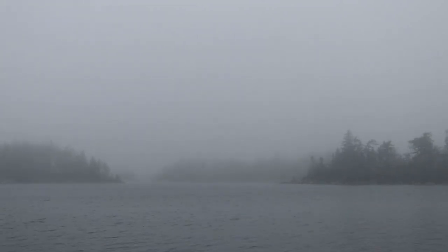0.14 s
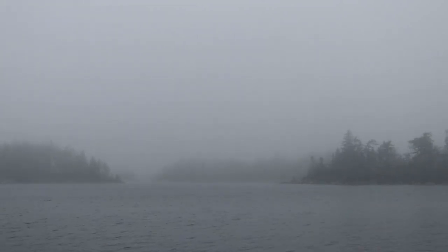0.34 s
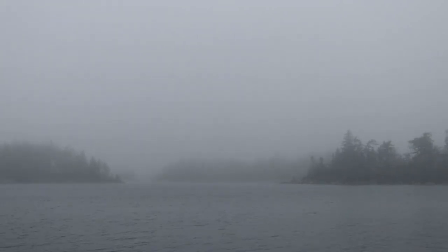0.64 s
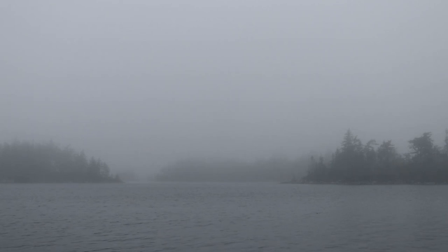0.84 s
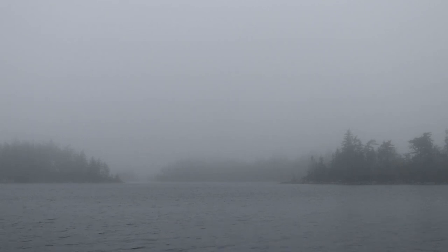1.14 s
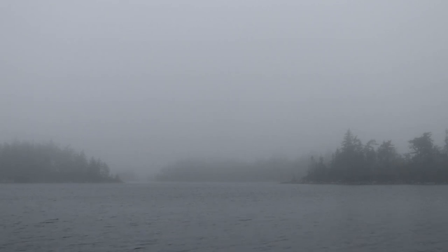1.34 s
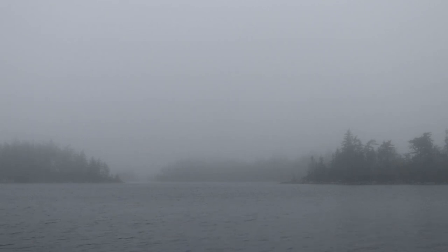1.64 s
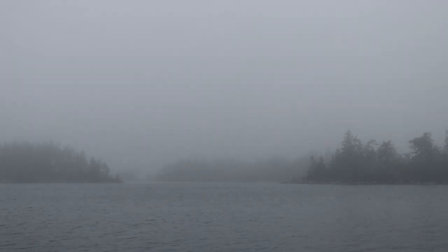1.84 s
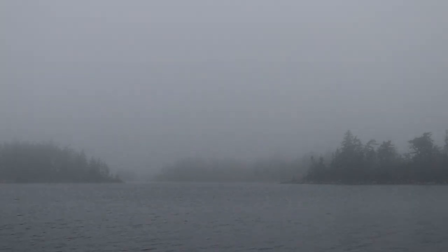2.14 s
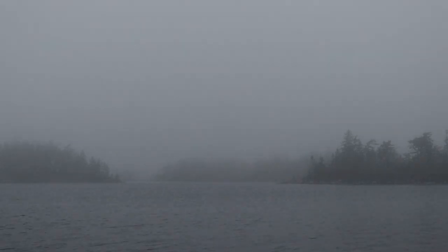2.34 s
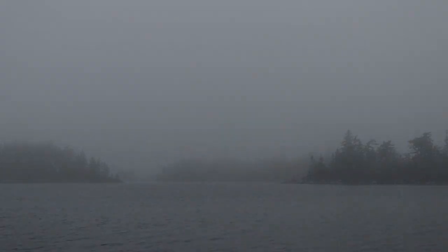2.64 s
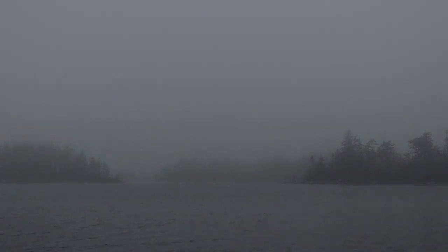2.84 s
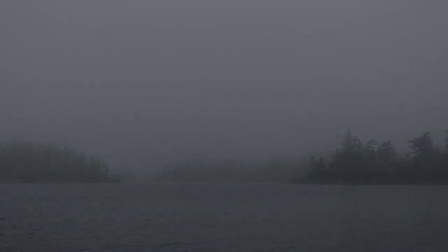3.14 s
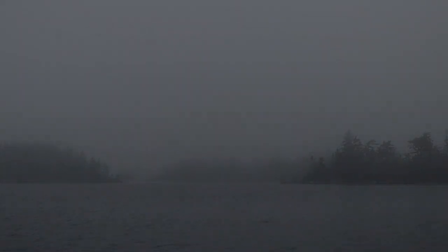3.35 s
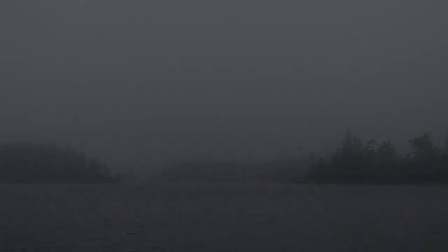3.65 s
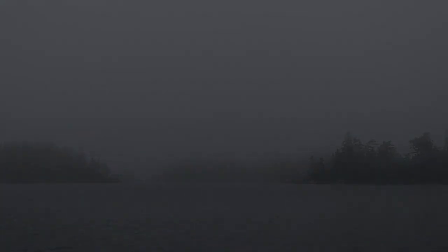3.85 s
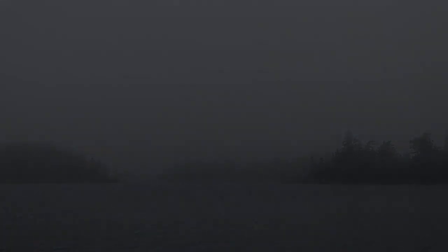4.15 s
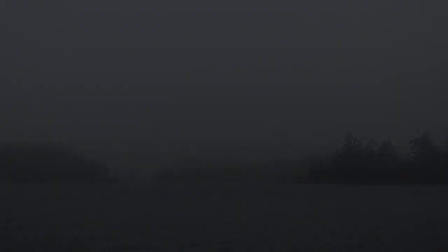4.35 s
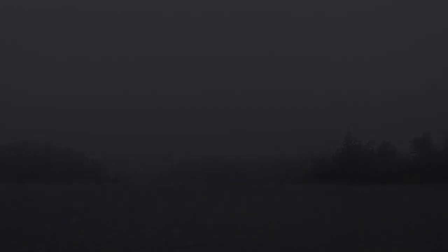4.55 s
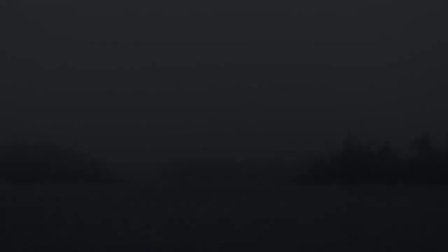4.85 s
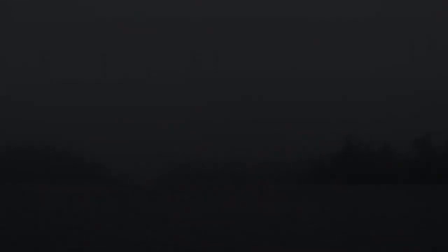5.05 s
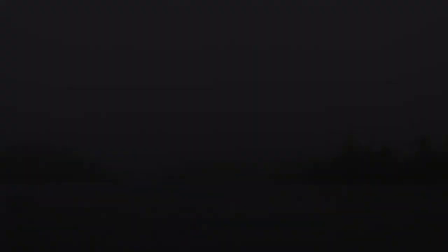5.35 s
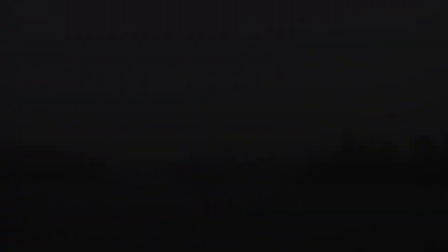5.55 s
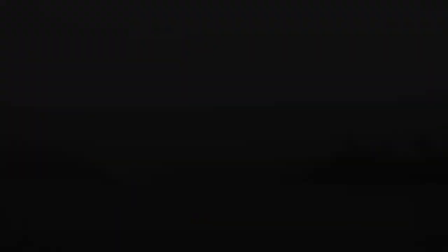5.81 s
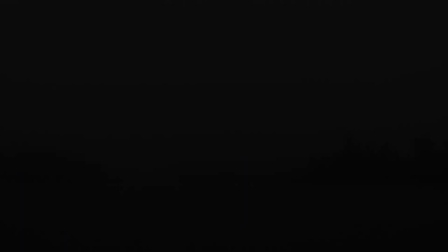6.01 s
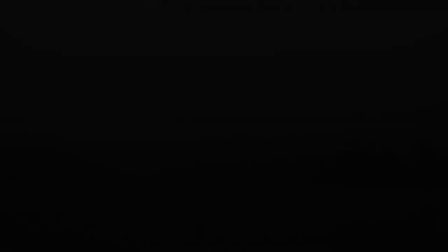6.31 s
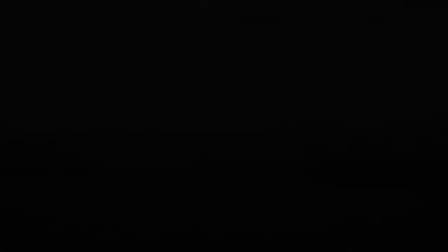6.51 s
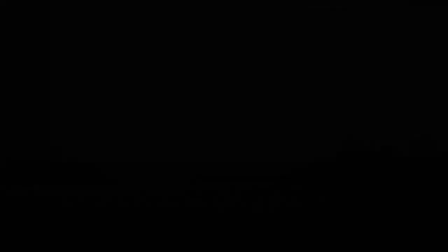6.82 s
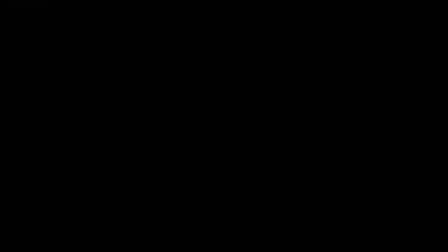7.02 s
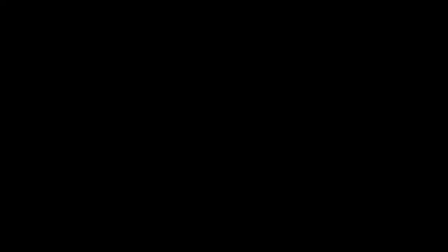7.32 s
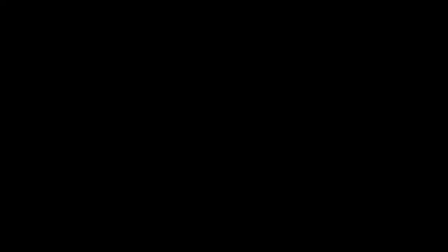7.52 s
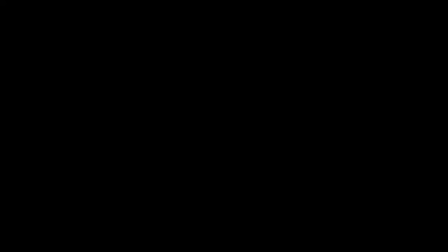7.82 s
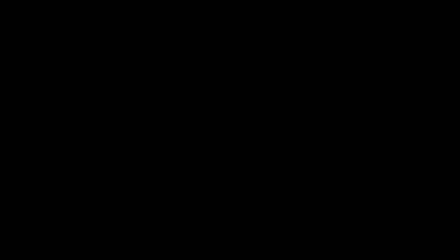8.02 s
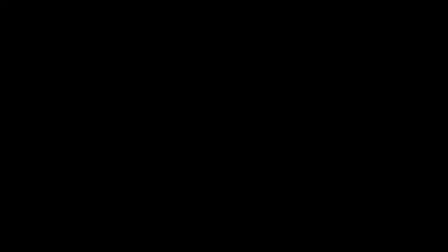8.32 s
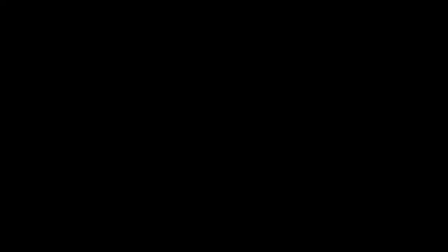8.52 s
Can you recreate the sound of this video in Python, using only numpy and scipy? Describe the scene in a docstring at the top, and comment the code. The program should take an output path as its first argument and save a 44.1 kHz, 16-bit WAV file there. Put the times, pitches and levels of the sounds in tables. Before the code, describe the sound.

Spring peeper frogs whistle shrilly beside a misty lake over a distant chorus, with close campfire pops, soft rustle and a slow fade.

```python
"""Spring peepers by a lake: from the start six near frogs peep over a haze of far ones, and trees echo them.
Air and water rustle throughout as swept tones, noise and damped pulses mix; a campfire ticks and pops close by.
From 1.5 s a bird sings one faint phrase; the slow fade begins at 2.3 s and water plips from 3 s.
Stray chirps are scattered from 4.5 s to 7.6 s; a log sizzles at 4.7 s; from 5.8 s the far chorus dies down,
and one low whoop comes just before the end. Faint noise of opposite sign in the channels widens the near-mono sound."""
import sys
import numpy as np
from scipy import signal
from scipy.fft import rfft, irfft, next_fast_len
from scipy.io import wavfile

SR = 44100
rng = np.random.default_rng(int(sys.argv[2]) if len(sys.argv) > 2 else 0)


def digitize_waveform(pressure):
    """Quantize a signal to 16-bit integers and store it at the path in sys.argv[1].

    Rows of a 2-D input are taken as channels; values are limited to [-1, 1].
    """
    field = np.atleast_2d(pressure).T
    bounded = np.clip(field, -1, 1)
    quanta = np.round(bounded * 32767).astype(np.int16)
    wavfile.write(sys.argv[1], SR, quanta)


N = 382347
TIME = np.arange(N) / SR


def undb(db):
    """Amplitude ratio: 20 dB is a factor of ten."""
    return 10 ** (np.asarray(db) / 20)


def unit(x):
    """Normalisation to a root-mean-square amplitude of 1."""
    return x / np.sqrt(np.mean(x ** 2))


def colour(points, size):
    """Spectral envelope: gain of each bin, from (frequency [Hz], level [dB]) points on a log-frequency axis."""
    hz, db = np.transpose(points)
    bin_hz = np.arange(size // 2 + 1) * SR / size
    return undb(np.interp(np.log(bin_hz + 1), np.log(hz), db))


def noise(points):
    """Spectral shaping: white noise filtered by an envelope, then scaled to rms 1."""
    size = next_fast_len(N, True)
    spectrum = rfft(rng.standard_normal(size))
    return unit(irfft(spectrum * colour(points, size), size)[:N])


def wander(t, rate):
    """Slow random modulation: normal values, rate per second, joined by straight lines."""
    return np.interp(t * rate, np.arange(2048), rng.standard_normal(2048))


def clock(length):
    """Sample times [s] of a short sound, at least 10 ms long."""
    return np.arange(int(max(length, .01) * SR)) / SR


def gate(t, attack, release):
    """Sine-squared envelope: a smooth onset and offset avoid clicks."""
    opening = np.minimum(t / attack, (t[-1] - t) / release)
    return np.sin(np.pi / 2 * np.clip(opening, 0, 1)) ** 2


def add(track, s, sound):
    """Linear superposition of a sound at time s, trimmed to the track."""
    i = int(s * SR)
    a, b = max(i, 0), min(i + len(sound), len(track))
    if b > a:
        track[a:b] += sound[a - i:b - i]


def forest(x, t60, gap=0.0055):
    """Diffuse reverberation off trunks and the far shore: a unit-energy noise tail falls 60 dB in t60."""
    t = np.arange(65536) / SR
    tail = rng.standard_normal(len(t)) * undb(-60 * t / t60) * (t > gap)
    return signal.fftconvolve(x, tail / np.linalg.norm(tail))[:len(x)]


def side_noise():
    """Decorrelation: a faint hiss and rumble that enters the two channels with opposite signs."""
    spectrum = [(30, 4.0), (130, 3.5), (500, 4), (1200, -11.5), (3000, -22.5), (5000, 1.5), (15000, 0.5)]
    return undb(-61.5) * noise(spectrum)


def air():
    """Broadband turbulence: a rustle of water and trees, and low gusts on the microphone as the breeze drops."""
    # spectral density of air and water: (frequency [Hz], relative level [dB per Hz])
    rustle_colour = [(25, 5.5), (60, -3), (120, -3), (250, -2.5), (550, -1), (900, -4.5), (1400, -7.5),
                     (2100, -14.5), (3800, -19), (5500, -20.5), (8000, -22), (15500, -24)]
    # gusts on the microphone: (centre [s], half width to 1/e [s], level before the fade [dB])
    gust_swells = [(0.046, 0.1, -47), (0.522, 0.27, -50), (1.813, 0.064, -44.5)]
    breeze_db, breeze_drop_db_per_s = -57, 2.5
    rustle = noise(rustle_colour) * undb(-48.5 + .5 * wander(TIME, 4.9))
    gusts = sum(undb(db) * np.exp(-((TIME - s) / half) ** 2) for s, half, db in gust_swells)
    wind = undb(breeze_db - breeze_drop_db_per_s * TIME) + gusts
    rumble = noise([(15, 0.5), (35, 3.5), (60, -1), (110, -19.5), (400, -54.5), (2000, -85)])
    return rustle + rumble * wind


def sizzle(start_s=4.68, length=0.37, db=-61):
    """Jet noise: steam escaping briefly from a damp log gives a high hiss that swells and sinks."""
    out, t = np.zeros(N), clock(length)
    steam = noise([(4000, -37), (8000, 17), (10000, 5), (13000, -12)])
    add(out, start_s, undb(db) * steam[:len(t)] * gate(t, t[-1] / 2, t[-1] / 2))
    return out


def plips(ring_s=0.0055):
    """Damped resonance: small bubbles at the water's edge ring and decay with time constant ring_s."""
    # bubbles at the shore: (time [s], frequency [Hz], level before decay and fade [dB])
    bubbles = [(3.03, 2150, -40), (5.695, 2140, -33), (5.697, 1250, -32.5), (5.989, 1276, -34)]
    out, t = np.zeros(N), clock(.06)
    for s, hz, db in bubbles:
        ring = np.sin(2 * np.pi * hz * t) * np.exp(-t / ring_s)
        add(out, s, undb(db) * ring * gate(t, 0.0027, .01))
    return out


def crack(bass_db, treble_db, echo_db, size=2048):
    """Minimum-phase impulse: wood splits in one sharp pulse; ground and logs return it milliseconds later."""
    # spectral envelope of splitting wood: (frequency [Hz], level [dB])
    wood_colour = [(60, -22.5), (220, -10.5), (700, -4), (1300, 0), (1900, 7.5), (3500, 7), (5600, 0),
                   (7000, 1), (8700, 4.5), (10000, -6), (13500, -5.5), (16000, -20)]
    tilt = [(600, bass_db), (2200, 0.0039), (3500, 0), (8500, treble_db)]
    gain = colour(wood_colour, size) * colour(tilt, size)
    # folding the cepstrum onto positive times gathers the energy at the onset
    cepstrum = irfft(np.log(gain))
    cepstrum[1:size // 2] *= 2
    cepstrum[size // 2 + 1:] = 0
    pulse = irfft(np.exp(rfft(cepstrum)))
    t = np.arange(size) / SR
    # rough bark and stones scatter it; two distinct reflections stand out
    paths = .14 * rng.standard_normal(size) * np.exp(-t / .004)
    paths[[int(.0022 * SR), int(.0041 * SR)]] += (.4, .65)
    return pulse + undb(echo_db) * signal.fftconvolve(pulse, paths)[:size]


def fire(count=55):
    """Impulsive radiation: loud pops among faint ticks, echoed by trees; weaker pops are scattered more."""
    # fire pops: (time [s], level before the fade [dB], bass tilt [dB], treble tilt [dB])
    pops = [(1.073, -21, -19, 9), (2.273, -29, -17, 6), (2.383, -16.5, -16, -9), (2.4754, 13.5, 5, -0.5),
            (2.839, -23.5, -16, 1), (3.085, -33.5, -14.5, 18), (3.108, -7.5, 9.5, 1),
            (3.405, -4.5, 22.5, -6), (4.591, -17, 7, -14), (5.0137, -38, -5, 15), (6.554, -32, -22, 15.5),
            (6.786, -6, 20, -3.5), (7.542, -33, -15, 11.5)]
    echo_at_0_db, echo_slope = -8.5, 0.24  # scatter of a 0 dB pop [dB]; dB less scatter per dB of level
    out = np.zeros(N)
    for s, db, bass_db, treble_db in pops:
        add(out, s, undb(db) * crack(bass_db, treble_db, echo_at_0_db - echo_slope * db))
    for when, loud in rng.random((count, 2)):
        add(out, when * TIME[-1], undb(-38 + 9 * loud ** 2) * crack(-9, 2.3, -1.5))
    return out + undb(-23) * forest(out, t60=0.3)


def chirp(length, start_hz, end_hz, buzz_hz, flutter_hz=210, arch_hz=0):
    """Frequency modulation: a gliding or arched whistle buzzes when its pitch flutters fast and unevenly."""
    t = clock(length)
    u = t / t[-1]
    flutter = np.sin(2 * np.pi * flutter_hz * t + .6 * wander(t, 100))
    glide = start_hz + (end_hz - start_hz) * u + arch_hz * np.sin(np.pi * u)
    hz = glide + buzz_hz * flutter
    whistle = np.sqrt(2) * np.sin(2 * np.pi * np.cumsum(hz) / SR)
    return whistle * gate(t, .006, 0.0082) * undb(3.8 * wander(t, 60))


def whoop(start_s=8.617, length=.044, db=-35):
    """Swept tone: one short, low whoop that weakens as it rises quickly."""
    out = np.zeros(N)
    weakening = undb(db - 130 * clock(length))
    add(out, start_s, weakening * chirp(length, 690, 1380, buzz_hz=22, arch_hz=-110))
    return out


def birds(count=9):
    """Frequency-swept song: whistles, a trill and two buzzes; later stray chirps, a faint whirr and a whistle."""
    # thin whistles that open the phrase: (time [s], length [s], nominal level before the fade [dB])
    whistles = [(1.453, .11, -55.5), (1.89, 0.1, -58), (2.185, 0.045, -47.5), (2.411, 0.067, -52),
                (2.653, 0.07, -58.5)]
    # buzzes that close the phrase: (time [s], centre frequency [Hz], nominal level before the fade [dB])
    buzzes = [(3.363, 5500, -58), (3.763, 5310, -62)]
    # stray arched chirps: (time [s], length [s], start of glide [Hz], nominal level before the fade [dB])
    stray_chirps = [(4.455, .055, 3600, -56), (6.943, .035, 4000, -60), (7.018, .065, 3650, -54),
                    (7.6, .04, 3320, -54)]
    first_hz, phrase_sag_hz_per_s, whistle_sag_hz = 6590, 300, 110
    trill_start_s, trill_step_s, trill_db = 2.748, .0615, -55
    upper_ratio, upper_db = 1.3, -10  # pitch ratio and relative level of the second voice
    out = np.zeros(N)
    # each whistle starts lower than the last
    for s, length, db in whistles:
        hz = first_hz - phrase_sag_hz_per_s * (s - whistles[0][0])
        add(out, s, undb(db) * chirp(length, hz, hz - whistle_sag_hz, buzz_hz=22))
    # the trill is a row of falling chips
    for k in range(count):
        add(out, trill_start_s + k * trill_step_s, undb(trill_db) * chirp(0.024, 4580, 4100, 16))
    for s, hz, db in buzzes:
        add(out, s, undb(db) * chirp(.1, hz, hz, buzz_hz=190, flutter_hz=190))
    for s, length, hz, db in stray_chirps:
        for voice_hz, voice_db in ((hz, db), (hz * upper_ratio, db + upper_db)):
            voice = chirp(length, voice_hz, voice_hz - 150, buzz_hz=300, flutter_hz=450, arch_hz=418)
            add(out, s, undb(voice_db) * voice)
    # far whirr, then far whistle
    add(out, 7.346, undb(-69.5) * chirp(0.82, 5800, 5890, buzz_hz=420))
    add(out, 8.1, undb(-65) * chirp(.2, 3835, 3750, buzz_hz=40))
    return out + undb(-7) * forest(out, t60=0.3)


def peep(length, start_hz, rise_hz_per_s, crest_s, attack_s, swell_db, reedy_db, third_db=-34, fourth_db=-42):
    """Selective radiation: the vocal sac radiates mostly the larynx's second harmonic, a rising whistle."""
    t = clock(length)
    # the rise slackens, and would stop at crest_s
    hz = start_hz + rise_hz_per_s * t * (1 - t / (2 * crest_s)) + 3 * wander(t, 70)
    larynx = np.pi * np.cumsum(hz) / SR  # phase at half the whistle's frequency
    reedy = undb(reedy_db + 5 * (t / t[-1] - 0.6) + 2 * wander(t, 9.3))  # brightens as the pitch rises
    overtones = undb(third_db) * np.sin(3 * larynx) + undb(fourth_db) * np.sin(4 * larynx)
    opening = gate(t, attack_s, .011)
    swell = opening * undb(swell_db * (t / t[-1] - .5) + 1.8 * wander(t, 42))
    return np.sqrt(2) * (np.sin(2 * larynx) + reedy * overtones) * swell


def far_frogs(count=135, lead_s=1):
    """Superposed incoherent callers of many sizes across the water, mostly echo; calling before the start."""
    # the chorus holds its level, then dies down
    chorus_db, lull_start_s, lull_db_per_s, lull_depth_db = -44.5, 5.79, 7, 15
    out = np.zeros(N + int(lead_s * SR))
    for k, (when, size, loud) in enumerate(rng.uniform(-1, 1, (count, 3))):
        db = 2 * loud - 7 * size ** 2  # middling voices carry best
        call = peep(.2, start_hz=2690 + 255 * size, rise_hz_per_s=2500, crest_s=.55,
                    attack_s=0.012, swell_db=-0.5, reedy_db=0.5)
        add(out, (k + when) / count * len(out) / SR, undb(db) * call)
    haze = forest(out, t60=.65)
    lull_db = np.clip((TIME - lull_start_s) * lull_db_per_s, 0, lull_depth_db)
    return unit((undb(-3.5) * out + haze)[-N:]) * undb(chorus_db - lull_db)


def near_frogs():
    """Direct sound plus reverberation: single callers on the near shore, each trailed by the trees' echo."""
    # each frog's voice: name: (start pitch [Hz], initial rise [Hz/s], time at which the rise would stop [s],
    # attack [s], swell over the call [dB], overtone boost [dB])
    voices = {"lead": (2746, 2342.5, 0.35, 0.01, 1, 2), "long": (2609, 2640, 0.5, 0.05, -1, 1),
              "quick": (2589.5, 2763.5, 0.95, 0.05, -3.5, -4),
              "gruff": (2490.5, 2699.5, 1.2, .015, -6.5, 7), "slow": (2497, 1500, 2.9, .03, 2.7, 5.6),
              "high": (3113, 2390.5, .16, .015, -8, -2)}
    # peeps: (time [s], frog [name], length [s], nominal level before the fade [dB])
    calls = [(.27, "high", .15, -45.5), (0.303, "gruff", .16, -37), (0.35, "lead", .21, -32.5),
             (.66, "lead", 0.18, -32), (0.751, "quick", 0.2, -36), (.98, "slow", .21, -40.5),
             (1.059, "quick", 0.24, -43), (1.551, "long", 0.24, -37), (1.805, "high", .16, -45.5),
             (1.853, "gruff", 0.14, -37), (2.302, "long", .25, -31.5), (2.602, "quick", 0.23, -44),
             (2.715, "lead", .13, -39), (2.762, "lead", 0.182, -31.5), (3.037, "slow", 0.21, -42.5),
             (3.255, "long", 0.24, -38), (3.488, "high", 0.15, -47.5), (3.547, "gruff", 0.16, -38.5),
             (3.674, "quick", .15, -48), (4.016, "long", .2, -36), (4.421, "lead", .19, -33.5),
             (4.661, "quick", 0.12, -48), (4.829, "lead", 0.205, -35.5), (4.888, "gruff", 0.11, -39.5),
             (5.04, "slow", 0.18, -43), (5.105, "high", 0.18, -49.5), (5.137, "long", 0.24, -40.5),
             (5.616, "long", 0.19, -38.5), (6.08, "lead", 0.19, -37), (6.088, "gruff", .12, -45.5),
             (6.572, "lead", .2, -41.5), (7.032, "long", .19, -48.5), (7.395, "lead", .12, -58)]
    out = np.zeros(N)
    for s, frog, length, db in calls:
        add(out, s, undb(db) * peep(length, *voices[frog]))
    bank = undb(-19) * forest(out, t60=.1)
    trees = undb(-8.0) * forest(out, t60=.75)
    return out + bank + trees


def scene():
    """Mid-side superposition: every source sits in the middle, and only the side noise differs by ear."""
    mid = near_frogs() + far_frogs() + birds() + whoop() + plips() + fire() + sizzle() + air()
    side = side_noise()
    return np.array([mid + side, mid - side])


def record(dry):
    """Soft saturation rounds the highest peaks; a slow fade and a steep low-pass filter follow."""
    # the fade is steered towards a silence that lies beyond the end
    fade_start_s, silent_s, fade_power, top_hz = 2.29, 9.67, 1.727, 15850
    rounded = .55 * np.tanh(dry / .55)
    fade = np.clip((silent_s - TIME) / (silent_s - fade_start_s), 0, 1) ** fade_power
    treble_cut = signal.ellip(10, .2, 70, top_hz, fs=SR, output="sos")
    return signal.sosfilt(treble_cut, rounded * fade)


dry = scene()
out = record(dry)
digitize_waveform(out)
```